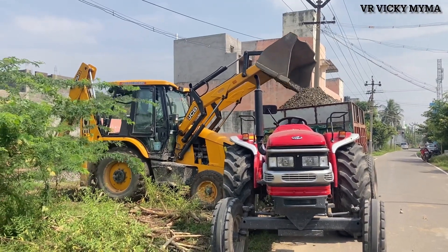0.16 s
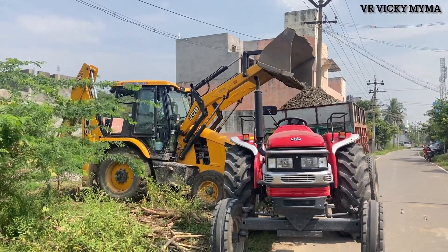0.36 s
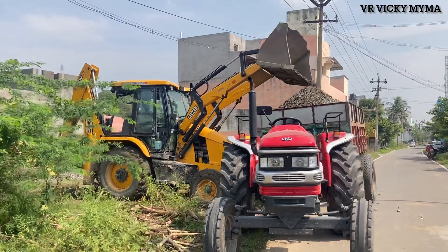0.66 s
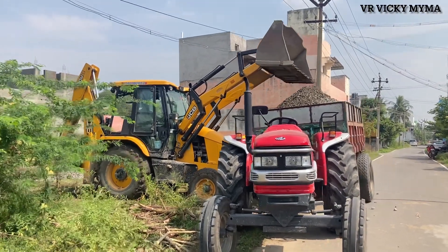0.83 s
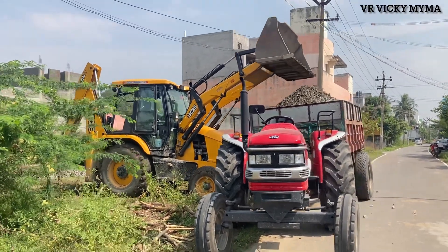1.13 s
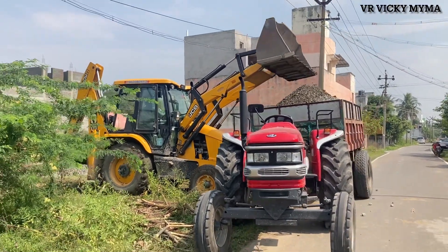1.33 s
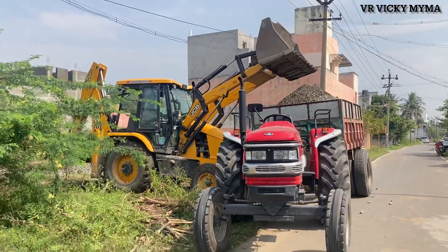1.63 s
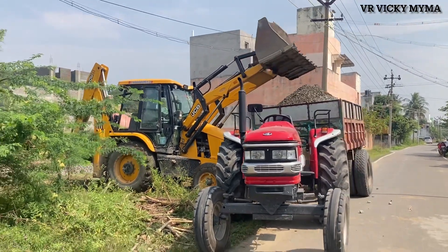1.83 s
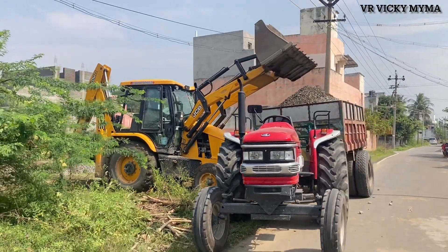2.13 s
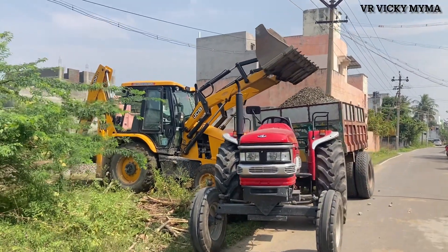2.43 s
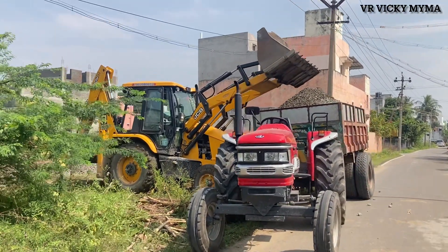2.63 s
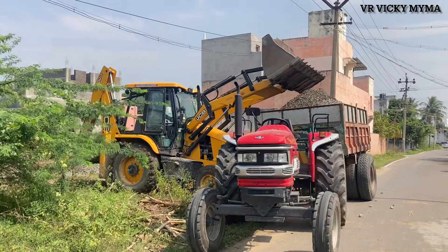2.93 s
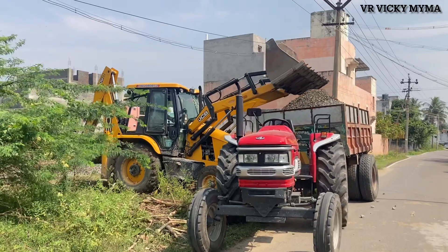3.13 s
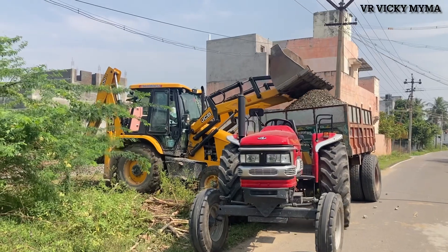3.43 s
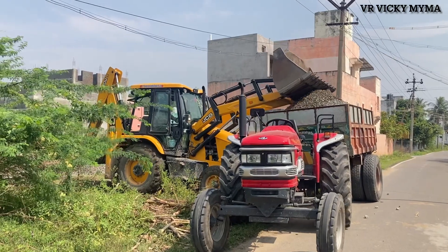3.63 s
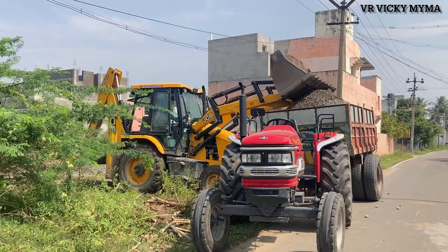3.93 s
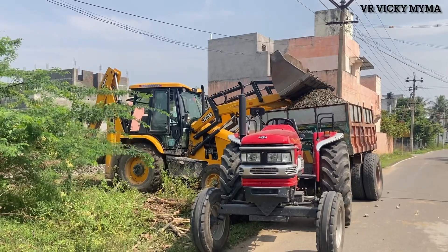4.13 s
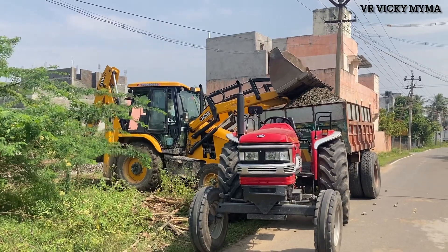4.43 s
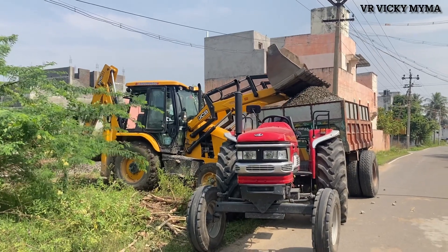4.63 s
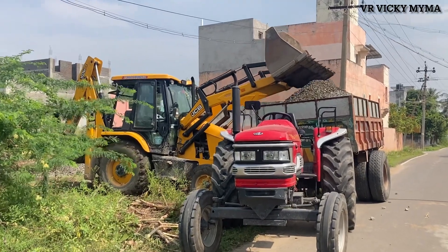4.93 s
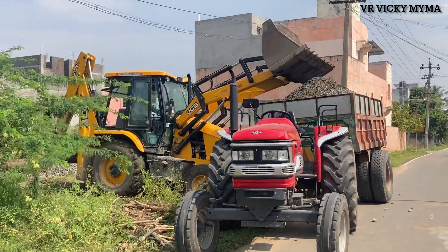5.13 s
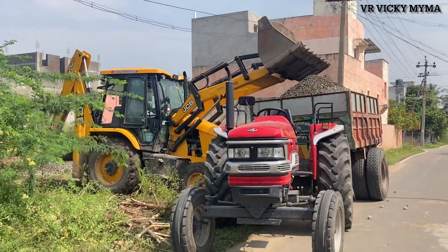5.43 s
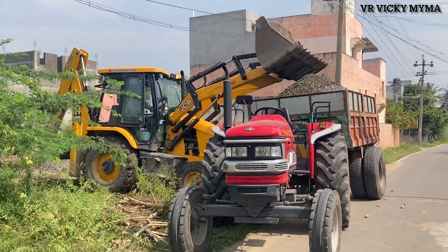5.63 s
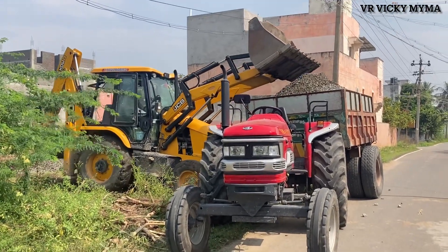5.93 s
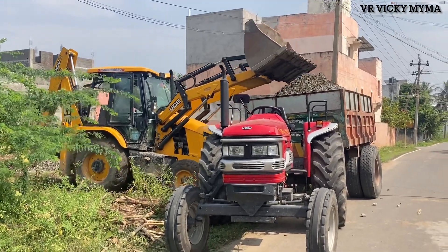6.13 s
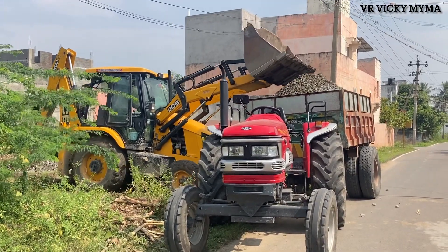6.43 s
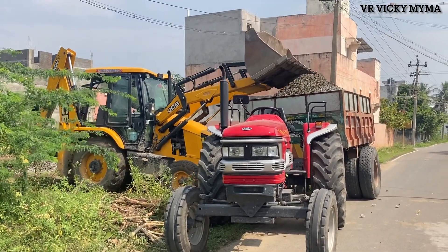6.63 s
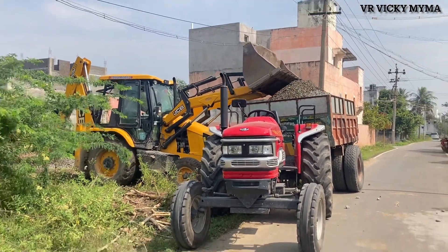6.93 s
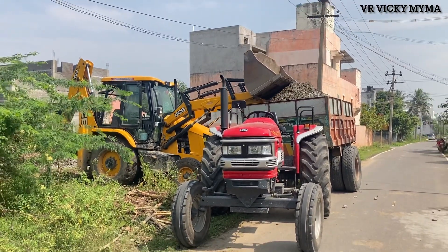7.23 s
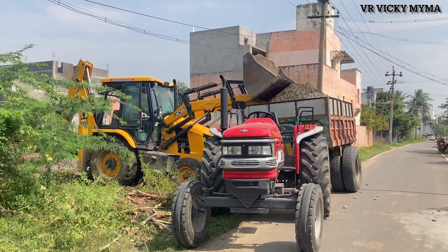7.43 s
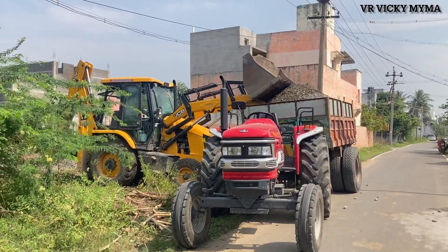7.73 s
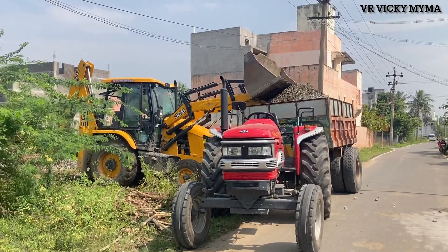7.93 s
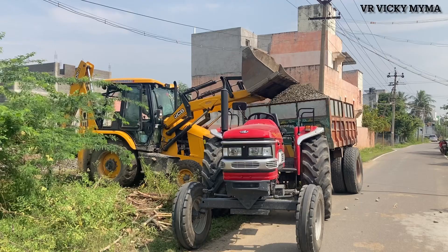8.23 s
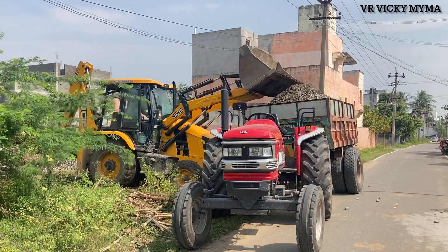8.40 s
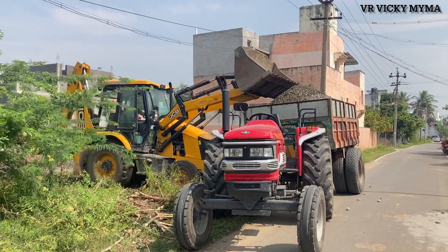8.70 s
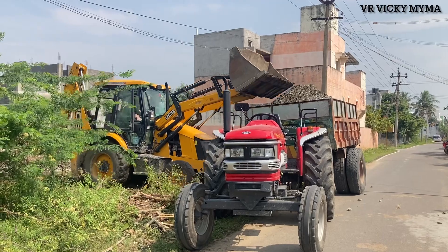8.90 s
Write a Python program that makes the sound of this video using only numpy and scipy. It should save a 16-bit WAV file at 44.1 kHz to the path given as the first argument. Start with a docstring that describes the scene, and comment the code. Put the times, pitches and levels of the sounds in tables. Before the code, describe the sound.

A backhoe loader's diesel engine idles and revs three times with metallic knocks, while its bucket crunches and clanks on stones in a trailer.

```python
"""A backhoe loader's four-cylinder diesel engine idles and revs up three times.
Each firing of a cylinder makes the exhaust throb, the engine block clatter and a hiss pulse.
A low rumble swells, a loose metal sheet taps at first, and the frame knocks under load.
The bucket levels stones on a trailer: they trickle and crunch, its steel clanks, the trailer thumps.
Each source has a direct and a scattered part, which two microphone ports mix into left and right."""
import sys
import numpy as np
from scipy import signal
from scipy.fft import rfft, irfft, next_fast_len
from scipy.io import wavfile
from scipy.ndimage import uniform_filter1d, map_coordinates

SR = 44100
rng = np.random.default_rng(int(sys.argv[2]) if len(sys.argv) > 2 else 0)


def transcribe(u):
    """Save the signal u as a 16-bit wav file named by the first command-line argument.

    u: samples, shape (n,) or (channels, n), limited to [-1, 1]; the rate is SR.
    q: integer samples, one column per channel.
    """
    v = np.clip(np.atleast_2d(u).T, -1, 1)
    q = np.round(v * 32767).astype(np.int16)
    wavfile.write(sys.argv[1], SR, q)


N = 399546

# How fast the engine runs: time_s, firings_per_s
ENGINE_SPEED = [(0, 30.65), (.6, 29.7), (1.68, 30.02), (1.82, 34.3), (2.05, 37.2), (2.5, 36.08),
                (3.05, 32.56), (4.2, 32.07), (4.95, 30.79), (5.0, 36.5), (5.12, 39.6), (5.55, 38.59),
                (5.85, 35.97), (6.2, 29.08), (7.3, 28.63), (8, 28.1), (8.3, 38.76), (8.75, 48.29),
                (9.06, 51.45)]
# Spells when the engine works hard: start_s, rise_s, hold_s, effort_db
LOAD_SPELLS = [(1.74, 0.068, 0.12, 8.5), (5.018, 0.025, 0.06, 17.5), (5.29, .02, .01, 6),
               (5.8, 0.014, 0.04, 11), (6.26, .015, .01, 6), (8.07, 0.11, 1.0, 16)]
# Base levels of the engine's sounds; a harmonic is a tone at a multiple of the firing rate:
# time_s, second_harmonic_db, third_harmonic_db, rumble_db, clatter_db, hiss_db
ENGINE_LEVELS = [(0, -29, -25.5, -36.5, -39.5, -48.5), (1.5, -26, -29, -37, -41.5, -51.5),
                 (2.25, -33.5, -30, -33.5, -39.5, -51), (2.9, -29, -37.5, -37.5, -41.5, -50),
                 (4.7, -31, -28, -34.5, -41.5, -52), (5.6, -43, -39, -32, -42, -54),
                 (6.5, -29.5, -32, -36.5, -43.5, -54), (7.8, -38, -27.5, -32.5, -40.5, -52.5),
                 (8.25, -33.5, -27, -32, -40.5, -51.5), (8.55, -36, -25, -29.5, -39.5, -53),
                 (8.7, -41, -30.5, -28.5, -40, -51), (8.87, -29.5, -33, -33, -37.5, -48.5),
                 (9.06, -33, -33, -29, -39, -54.5)]
# Exhaust harmonics four to seven, compared with the third: level_db
UPPER_HARMONICS_DB = [-21.5, -25, -19, -27]
# Tone colour of the rattling engine block: pitch_hz, level_db
BLOCK_COLOUR = [(130, -42), (220, 6.5), (290, -3), (345, 10), (430, -35), (520, 3.5), (850, 1), (1150, 0),
                (1290, -3), (1500, -6), (1900, -3.5), (2600, -9.5), (3500, -9.5), (5000, -13), (7000, -75),
                (12000, -76)]
# Modes (the pitches a thing rings at) of the engine's panels: pitch_hz, width_hz, level_db
PANEL_MODES = [(342, 65, 2), (530, 90, -5), (735, 150, -4.5), (1120, 160, -4.5), (1468, 70, -2.5),
               (1640, 140, -9), (2103, 70, -5), (2560, 150, -5), (3500, 200, -14)]
# Tone colour of the hiss: pitch_hz, level_db
HISS_COLOUR = [(2000, -24), (3500, -14), (4600, 13), (5600, 5), (6800, 3.5), (8300, 4.5), (9500, 1),
               (11000, 6), (12500, 0.5), (13400, 12), (14400, -7.5), (15800, 6)]
# Tone colour of the rumble: pitch_hz, level_db
RUMBLE_COLOUR = [(18, -27), (30, -27), (42, 8), (65, 9), (110, 9.5), (150, 4.5), (220, -5.5), (300, -10),
                 (450, -16), (900, -37.5)]
# How strongly the loose sheet taps: time_s, level_db
SHEET_LEVELS = [(0, -44), (.5, -42), (.92, -42.5), (1.0, -48), (1.5, -55)]
# Ringing of the loose sheet: pitch_hz, width_hz, level_db
SHEET_MODES = [(1190, 55, 0), (1480, 70, -10)]
# Stones sliding from the bucket: time_s, level_db
SLIDE_LEVELS = [(0, -61), (.1, -44), (.26, -63), (.37, -51), (.46, -57.5), (.9, -59.5), (1.27, -60),
                (1.5, -65)]
# Tone colour of sliding stones: pitch_hz, level_db
SLIDE_COLOUR = [(1500, -15), (3500, 1), (7000, 1.5), (11500, 3), (15800, -7)]
# The bucket bites into the stones: time_s, level_db, half_length_s, boom_offset_db, treble_limit_hz
STONE_CRUNCHES = [(0.135, -45.5, 0.041, 8.5, 14000), (3.564, -47.5, 0.032, 8, 9000),
                  (3.854, -39, 0.013, 7.5, 14000), (4.338, -41, 0.012, -1, 14000),
                  (4.403, -41, 0.0089, -3, 4300), (4.436, -42.5, 0.03, 11.5, 4300),
                  (7.291, -36, 0.012, 5.5, 14000), (7.325, -44, 0.049, 7, 4500),
                  (7.846, -40, 0.013, 1, 14000), (7.963, -45, 0.019, 10.5, 5000)]
# Tone colour of crunching stones: pitch_hz, level_db
CRUNCH_COLOUR = [(600, -28), (1400, 8.5), (2100, 8), (2750, 4), (3600, 7.5), (4800, 11), (6500, 1),
                 (11000, -2.5), (15800, -6)]
# Low boom of the bucket's shell: pitch_hz, width_hz, level_db
SHELL_MODES = [(255, 60, -3), (415, 45, 3), (560, 90, -2), (720, 150, -7), (1050, 300, -10)]
# Spells when the straining frame knocks: start_s, rise_s, hold_s, level_db
FRAME_STRAINS = [(1.72, .04, .15, -37), (5.035, .02, .06, -30), (8.085, .09, .3, -29), (8.5, .04, .3, -28),
                 (8.85, .04, .16, -26)]
# Drone of the straining frame: pitch_hz, width_hz, level_db
DRONE_MODES = [(352, 30, 2), (425, 50, -9), (558, 45, 1), (725, 70, -8), (958, 50, -3), (1110, 110, -4),
               (2600, 190, -8)]
# The frame bangs under load: start_s, crack_db, pitch_hz, low_ring_db, high_ring_db
FRAME_BANGS = [(1.763, -13, 548, -34, -37), (5.004, -16, 532, -28.5, -32), (5.054, -23, 527, -33, -33),
               (5.082, -16, 540, -29.5, -43), (5.801, -25, 526, -31.5, -50), (8.023, -27, 513, -35, -41),
               (8.09, -24, 544, -28, -33), (8.15, -9, 539, -27, -25), (8.211, -19, 544, -29, -31.5),
               (8.265, -14, 564, -22.5, -25.5), (8.341, -16, 542, -24.5, -34),
               (8.463, -18, 559, -30.5, -27), (8.511, -22, 529, -32, -27.5), (8.557, -11, 577, -23, -31),
               (8.6, -12, 552, -26.5, -31.5), (8.642, -17, 585, -27, -31), (8.664, -16, 560, -24.5, -41),
               (8.728, -24, 565, -24, -28.5), (8.811, -7, 525, -29, -28.5), (8.849, -12, 580, -28.5, -30.5),
               (8.909, -18, 544, -27.5, -25), (8.971, -11, 556.5, -24, -23)]
# Tone colour of the crack that opens a bang: pitch_hz, level_db
CRACK_COLOUR = [(200, -20), (400, 4), (1150, -6), (1400, -12), (2700, -16), (5000, -38), (12000, -55)]
# The frame's low ring, before each bang retunes it: pitch_hz, width_hz, level_db
FRAME_LOW_MODES = [(350, 20, -9), (555, 25, 0), (730, 50, -9)]
# The frame's high ring, also retuned: pitch_hz, width_hz, level_db
FRAME_HIGH_MODES = [(955, 30, 0), (1105, 120, -9), (2570, 150, -12)]
# The bucket clanks and rattles: start_s, level_db, ring_s, brightness_db_per_octave
BUCKET_CLANKS = [(2.146, -46, .008, -7), (2.165, -41, .007, -7), (2.177, -40, 0.0062, -9),
                 (2.188, -45, .007, -6), (2.204, -42, .008, -6), (2.213, -47, .008, -7),
                 (3.85, -36, 0.021, 1), (4.329, -43, 0.016, 3), (4.398, -42, 0.029, -2),
                 (4.433, -43, 0.025, -7), (7.279, -38, 0.016, 2), (7.29, -29.5, 0.017, -6),
                 (7.317, -40, 0.017, -8), (7.352, -45, .014, 2), (7.842, -37.5, .02, 3.5)]
# Bright ring of the bucket's steel: pitch_hz, width_hz, level_db
STEEL_MODES = [(1500, 90, -7), (2030, 150, 2), (2500, 60, -6), (3020, 100, -4), (3450, 50, -9),
               (3990, 60, 0), (5400, 120, -7), (6345, 40, -7), (7800, 60, -9)]
# Dull blows on the trailer: start_s, level_db
TRAILER_BLOWS = [(2.91, -28), (4.219, -25.5), (4.346, -19), (4.46, -23), (5.41, -20.5), (5.809, -24),
                 (6.239, -25.5), (6.693, -17.5), (7.689, -20.5), (7.768, -22)]
# Ringing of the trailer's body: pitch_hz, width_hz, level_db
TRAILER_MODES = [(152, 53, 1), (206, 61, -1), (237, 20, 3), (410, 300, -29), (670, 290, -31)]
# How much scattered sound reaches the ports: pitch_hz, level_db
SCATTERED_LEVELS = [(60, -11), (300, -9.5), (1000, -8), (2500, -8), (5000, -9), (9000, -11), (15000, -11)]
# How far the wave at the left port runs ahead of the right: pitch_hz, lead_radians
LEFT_LEAD = [(0, 0), (1500, .5), (4000, 1.2), (4700, 2.8), (5900, 3), (6400, .5), (7000, 0),
             (15750, -12.57)]
# How much louder the left port is than the right: pitch_hz, level_db
LEFT_BOOST = [(60, -1.6), (130, -1), (290, -0.5), (640, 0.5), (1410, 4), (3100, 0), (6820, -0.5),
              (15000, 0.5)]

IDLE_RATE, FAST_RATE = 30, 42  # firings per second
TOP_HZ = 15850


def amp(db):
    """Turn decibels into a number to multiply a sound by."""
    return 10 ** (np.asarray(db) / 20)


def unit(x):
    """Scale a sound to an average power of 1."""
    return x / np.sqrt(np.mean(x ** 2) + 1e-20)


def along(points, hz):
    """Read between (pitch_hz, value) points, with octaves evenly spaced."""
    pitches, values = np.transpose(points)
    return np.interp(np.log(hz + 1), np.log(pitches + 1), values)


def curves(rows):
    """Join timed rows with straight lines: one curve for each column after the time."""
    times, *columns = np.transpose(rows)
    return [np.interp(np.arange(N) / SR, times, column) for column in columns]


def passage(rows):
    """A volume curve from (time_s, level_db) rows, fading to silence outside them."""
    t = np.arange(N) / SR
    inside = (t >= rows[0][0]) & (t <= rows[-1][0])
    return amp(curves(rows)[0]) * uniform_filter1d(inside * 1., size=2000)


def wobble(rate):
    """A smooth curve through `rate` random values a second."""
    return map_coordinates(rng.standard_normal(int(N * rate / SR) + 4), [np.arange(N) * rate / SR])


def noise():
    """Two white noises: the direct sound and the scattered sound."""
    return rng.standard_normal((2, N))


def filtered(x, response):
    """Scale and shift each frequency in a sound by response(hz)."""
    size = next_fast_len(N + SR // 4)
    return irfft(rfft(x, size) * response(np.fft.rfftfreq(size, 1 / SR)), size)[..., :N]


def coloured(x, colour):
    """Give a sound a tone colour; white noise keeps its power."""
    return filtered(x, lambda hz: unit(amp(along(colour, hz))))


def resonate(x, modes, order=1):
    """Let a sound ring a set of modes; a higher order lets less through between them."""
    def response(hz):
        gain = sum(amp(db) * (1j * hz * width / (pitch ** 2 - hz ** 2 + 1j * hz * width)) ** order
                   * (-1) ** k for k, (pitch, width, db) in enumerate(modes))
        gain = gain / (1 + (hz / (2 * modes[-1][0])) ** 2)
        return gain / np.sqrt(np.mean(abs(gain) ** 2))
    return filtered(x, response)


def bursts(firings, decay_cycles, steady, scatter_db, alternate_db):
    """A volume curve that jumps at each firing, then dies down; cylinders differ in strength."""
    index = firings.astype(int)
    age = firings - index
    size_db = scatter_db * rng.standard_normal(size=1024)[index] + alternate_db * (-1) ** index
    rise = 1 - np.exp(-age / .05)
    return unit(steady + amp(size_db) * np.exp(-age / decay_cycles) * rise)


def load_spell(start_s, rise_s, hold_s, early_s=.05, release_s=.067):
    """One spell of load, from 0 to 1: it rises a little early, holds, then ebbs."""
    age = np.arange(N) / SR - start_s
    return np.clip((age + early_s) / rise_s, 0, 1) * np.exp(-np.maximum(age - hold_s, 0) / release_s)


def effort(sag_db_per_s=5.5):
    """Decibels that the open throttle adds; the effort eases as the engine gains speed."""
    t = np.arange(N) / SR
    return sum((db - sag_db_per_s * (t - start_s)) * load_spell(start_s, rise_s, hold_s)
               for start_s, rise_s, hold_s, db in LOAD_SPELLS)


def exhaust(firings, rate, second_db, third_db, silencer_hz=129.6, pipe_hz=242.4, pipe_width_hz=22.7):
    """The exhaust throbs through the silencer, mostly at twice and three times the firing rate."""
    phase = 2 * np.pi * firings
    first_gain = amp(np.interp(rate, [IDLE_RATE, FAST_RATE], [-34, -10]))
    low_tones = amp(second_db) * (np.sin(2 * phase) + first_gain * np.sin(phase))
    # At high speed the silencer shuts out the third harmonic and those above it.
    passed = 1 / np.sqrt(1 + (3 * rate / silencer_hz) ** 20)
    upper = sum(amp(db + 2.5 * wobble(10)) * np.sin(k * phase)
                for k, db in enumerate(UPPER_HARMONICS_DB, 4))
    high_tones = amp(third_db) * passed * (np.sin(3 * phase) + upper)
    # The pipe rings when the sixth harmonic sweeps through its pitch.
    off_pitch = (6 * rate - pipe_hz) / pipe_width_hz
    pipe = amp(-42 + wobble(2.13)) * np.sin(6 * phase) / (1 + off_pitch ** 4)
    throb = np.sqrt(2) * (low_tones + high_tones + pipe)
    sway = .4 * wobble(5)
    return np.array([throb, sway * throb])


def injectors(firings, scatter_db=.8):
    """The fuel injectors tap once per firing, a little uneven in time and strength."""
    fired = np.flatnonzero(np.diff(firings.astype(int)))
    late, size, scattered = rng.standard_normal((len(fired), 3)).T
    delay_s = .005 + .00006 * late
    at = np.clip(fired + (SR * delay_s).astype(int), 0, N - 1)
    taps = np.zeros((2, N))
    taps[:, at] = amp(scatter_db * size) * [np.ones(len(fired)), scattered]
    return unit(taps)


def clatter(firings, level_db):
    """Injectors and valves rattle the block and ring its panels at every firing."""
    pulses = bursts(firings, decay_cycles=.5, steady=.38, scatter_db=1.2, alternate_db=0)
    block = amp(1.5) * coloured(pulses * noise(), BLOCK_COLOUR)
    shaking = amp(-12) * injectors(firings) + amp(-2 + 1.9 * wobble(12)) * pulses * noise()
    panels = amp(3) * resonate(shaking, PANEL_MODES, order=2)
    return amp(level_db + .35 * wobble(8.8)) * (block + panels)


def hiss(firings, rate, level_db, puff_s=.012):
    """A hiss comes in one short puff per firing; the puffs merge as the engine speeds up."""
    puffs = bursts(firings, decay_cycles=puff_s * rate, steady=.33, scatter_db=1.7, alternate_db=1)
    flutter_db = .8 * wobble(11)
    return amp(level_db + 6.5 + flutter_db) * coloured(puffs * noise(), HISS_COLOUR)


def rumble(level_db):
    """The machine and the breeze make an uneven low roar."""
    swell_db = 1.1 * wobble(14)
    return amp(level_db + 5 + swell_db) * coloured(noise(), RUMBLE_COLOUR)


def loose_sheet(firings):
    """A loose sheet of metal taps three times in every four firings, then settles."""
    beats = np.floor(.75 * firings - .52)
    at = np.flatnonzero(np.diff(beats))
    taps = np.zeros((2, N))
    taps[0, at] = amp(1.8 * rng.standard_normal(len(at)))
    return passage(SHEET_LEVELS) * resonate(taps / np.std(taps[0]), SHEET_MODES, order=2)


def stone_clicks(per_s, spread_db):
    """Stones touch at random moments, each with a click of its own strength."""
    hits = rng.random(N) < per_s / SR
    strength = amp(spread_db * np.minimum(rng.exponential(size=N), 4))
    return unit(hits * strength * noise())


def stones(boom_delay_s=.02):
    """Stones slide from the bucket and crack under its edge; its shell booms a moment later."""
    t = np.arange(N) / SR
    clicks = stone_clicks(per_s=3500, spread_db=2.8)
    grit, shell_push = np.zeros((2, N)), np.zeros(N)
    for time_s, db, half_length_s, boom_db, treble_hz in STONE_CRUNCHES:
        age = t - time_s
        crush = amp(db) / (1 + (age / half_length_s) ** 2)
        grit += signal.lfilter(*signal.butter(4, min(treble_hz, TOP_HZ), fs=SR), crush * clicks)
        shell_push += amp(db + boom_db) * np.exp(-((age - boom_delay_s) / (2 * half_length_s + .014)) ** 2)
    crunch = amp(9) * coloured(grit, CRUNCH_COLOUR)
    boom = resonate(shell_push * stone_clicks(per_s=1500, spread_db=2), SHELL_MODES)
    slide = coloured(stone_clicks(per_s=14000, spread_db=1.5), SLIDE_COLOUR)
    return crunch + boom + amp(12) * passage(SLIDE_LEVELS) * slide


def struck_steel(start_s, modes, ring_s, tuning=1, rise_s=.0019):
    """Struck steel swells quickly, then dies away; wider modes waver more in pitch."""
    t = np.arange(SR // 6) / SR
    hz, width, db = np.transpose(modes)[:, :, None]
    drift = np.cumsum(rng.standard_normal((len(hz), len(t))) * np.sqrt(width / SR), axis=1)
    phase = 2 * np.pi * (tuning * hz * t + rng.random(hz.shape)) + drift
    volume = (1 - np.exp(-t / rise_s)) * np.exp(-(t / ring_s) ** 1.5)
    ring = np.sqrt(2) * volume * np.sum(amp(db) * np.sin(phase), axis=0)
    return np.pad(ring, (round(start_s * SR), N))[:N]


def frame_knocks(firings, crack_decay_s=.006):
    """Under load the frame drones with the firings; each bang cracks, then rings low and high."""
    taps = injectors(firings)
    pulses = bursts(firings, decay_cycles=.3, steady=.3, scatter_db=1.5, alternate_db=1)
    rattle = .5 * taps + .8 * pulses * noise()
    strain, hits, rings = np.zeros((3, N))
    for start_s, rise_s, hold_s, db in FRAME_STRAINS:
        strain += amp(db) * load_spell(start_s, rise_s, hold_s) ** 2
    for start_s, crack_db, hz, low_db, high_db in FRAME_BANGS:
        hits[round(start_s * SR)] = amp(crack_db)
        tuning = hz / FRAME_LOW_MODES[1][0]
        rings += amp(low_db) * struck_steel(start_s, FRAME_LOW_MODES, ring_s=.031, tuning=tuning)
        rings += amp(high_db) * struck_steel(start_s, FRAME_HIGH_MODES, ring_s=.023, tuning=tuning ** .5)
    cracks = signal.lfilter([1], [1, -np.exp(-1 / (crack_decay_s * SR))], hits) * noise()
    drone = resonate(strain * rattle, DRONE_MODES, order=2)
    frame = amp(-4.5) * drone + amp(-13) * coloured(cracks, CRACK_COLOUR)
    frame[0] += amp(1.5) * rings  # direct sound only
    return frame


def bucket_clanks():
    """The bucket rings where it hits a stone or rattles on its pins; some clanks are dull, some sharp."""
    clanks = np.zeros((2, N))
    for start_s, db, ring_s, brightness in BUCKET_CLANKS:
        modes = [(hz, width, mode_db + db + brightness * np.log2(hz / STEEL_MODES[3][0]))
                 for hz, width, mode_db in STEEL_MODES]
        clanks += [struck_steel(start_s, modes, ring_s), struck_steel(start_s, modes, ring_s)]
    return clanks


def trailer_thumps():
    """Shifting weight knocks on the trailer's body."""
    blows = np.zeros((2, N))
    for start_s, db in TRAILER_BLOWS:
        blows[:, round(start_s * SR)] = amp(db + 23.5)
    return resonate(blows, TRAILER_MODES)


def microphone_ports(direct, scattered):
    """Two openings hear the direct sound slightly out of step, and the scattered with opposite signs."""
    sides = np.array([[1], [-1]])  # left, right
    spread = filtered(scattered, lambda hz: amp(along(SCATTERED_LEVELS, hz)))

    def response(hz):
        lead = np.interp(hz, *np.transpose(LEFT_LEAD))
        return amp(sides * along(LEFT_BOOST, hz) / 2) * np.exp(.5j * sides * lead)
    return filtered(direct + sides * spread, response)


def scene():
    """The firings set the engine's beat; it grows louder with effort, and the bucket's work joins in."""
    rate, = curves(ENGINE_SPEED)
    firings = np.cumsum(rate) / SR  # counts up by one at each firing
    octaves_above_idle = np.log2(rate / IDLE_RATE)
    effort_db = effort()
    second_db, third_db, rumble_db, clatter_db, hiss_db = curves(ENGINE_LEVELS)
    engine = (exhaust(firings, rate, second_db + effort_db, third_db + .48 * effort_db)
              + clatter(firings, clatter_db + 2.5 * octaves_above_idle + .084 * effort_db)
              + hiss(firings, rate, hiss_db + 5 * octaves_above_idle + .23 * effort_db)
              + rumble(rumble_db + .2 * effort_db)
              + frame_knocks(firings) + loose_sheet(firings))
    direct, scattered = engine + stones() + bucket_clanks() + trailer_thumps()
    return microphone_ports(direct, scattered)


def record(dry):
    """Cut away the very highest treble."""
    return filtered(dry, lambda hz: hz < TOP_HZ)


dry = scene()
out = record(dry)
transcribe(out)
```